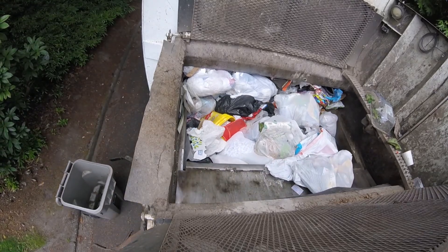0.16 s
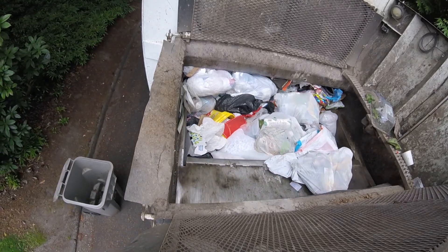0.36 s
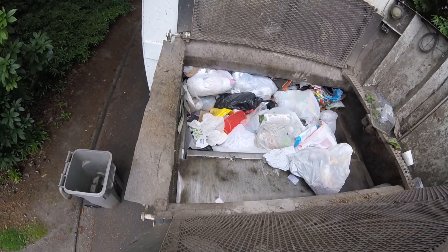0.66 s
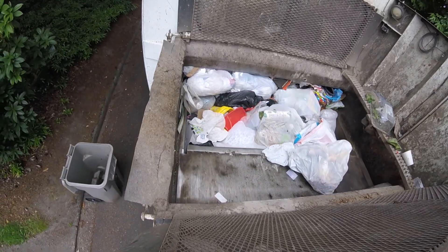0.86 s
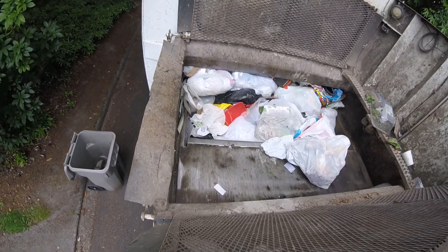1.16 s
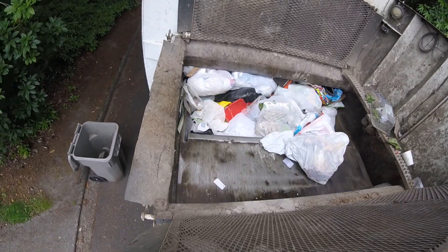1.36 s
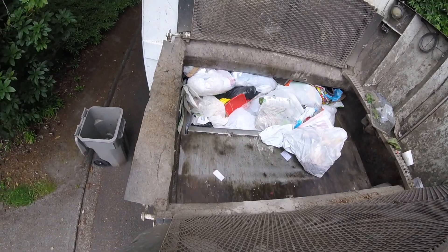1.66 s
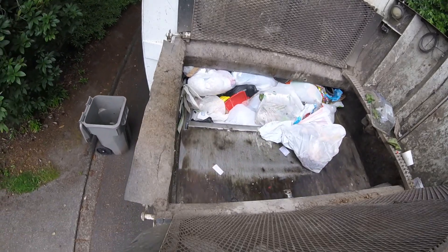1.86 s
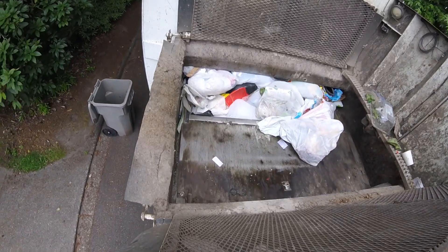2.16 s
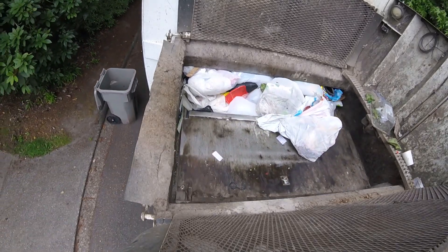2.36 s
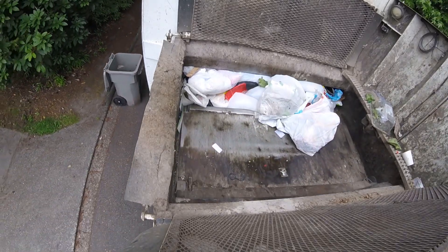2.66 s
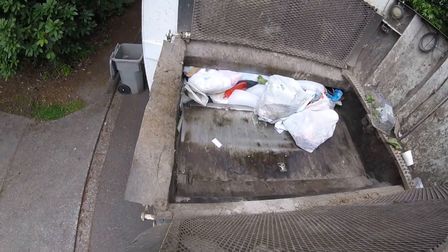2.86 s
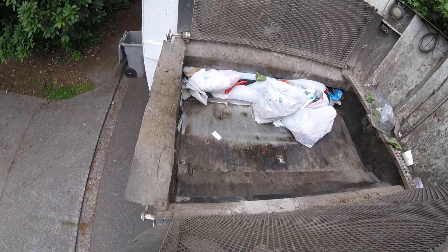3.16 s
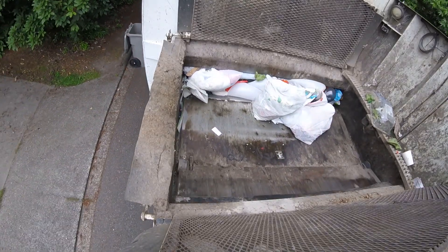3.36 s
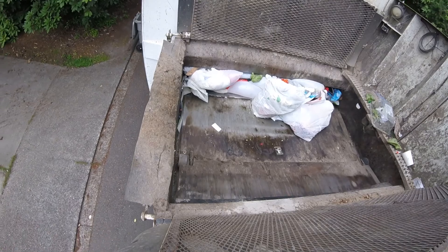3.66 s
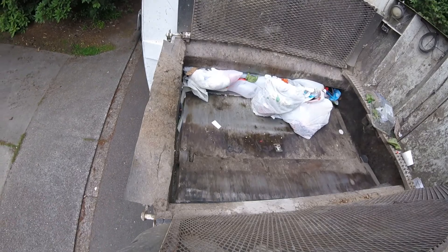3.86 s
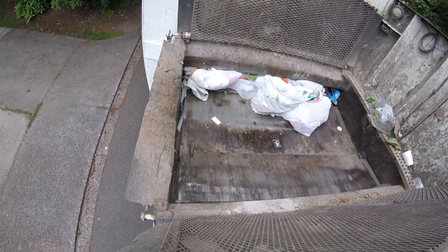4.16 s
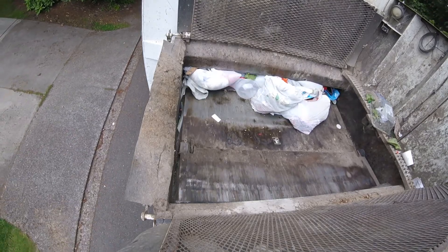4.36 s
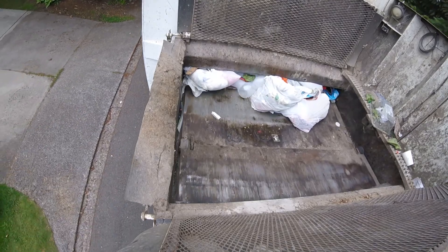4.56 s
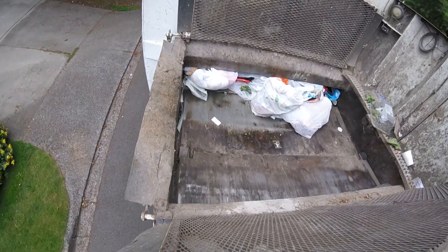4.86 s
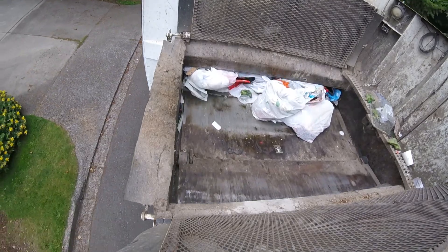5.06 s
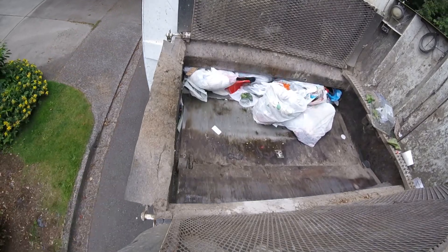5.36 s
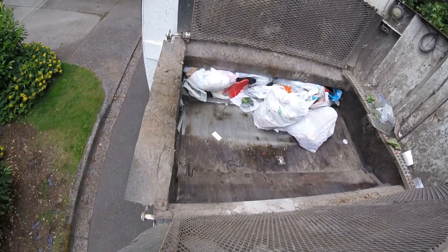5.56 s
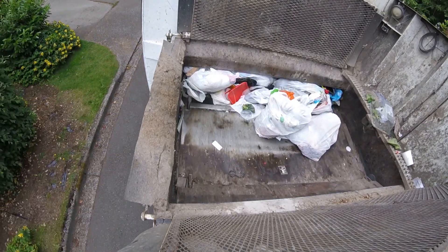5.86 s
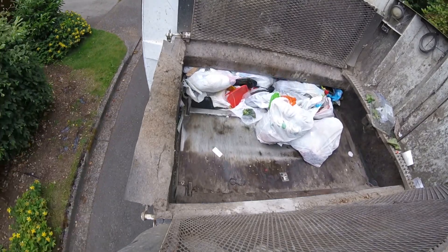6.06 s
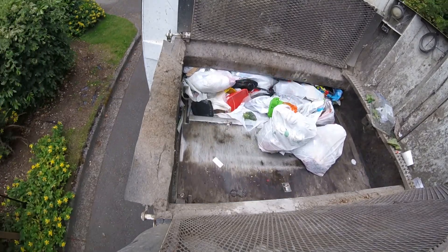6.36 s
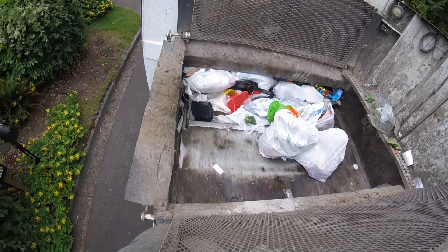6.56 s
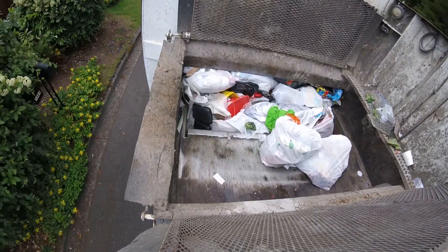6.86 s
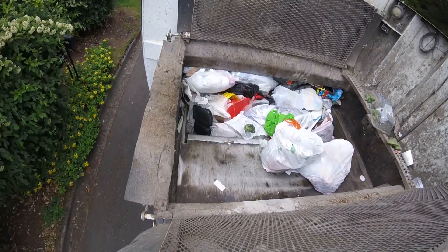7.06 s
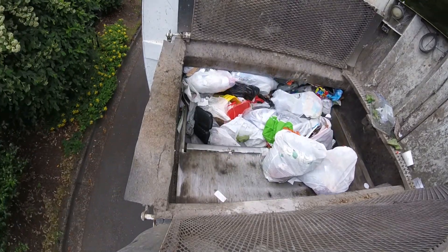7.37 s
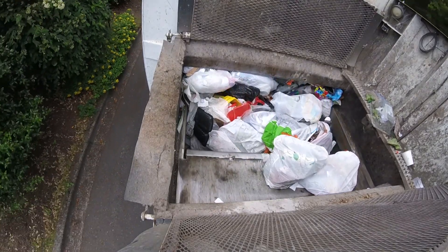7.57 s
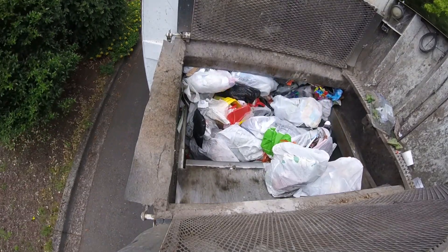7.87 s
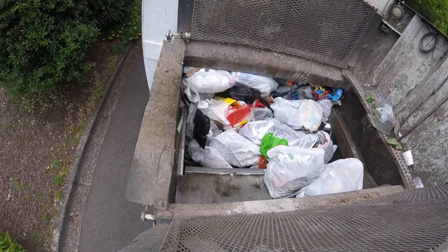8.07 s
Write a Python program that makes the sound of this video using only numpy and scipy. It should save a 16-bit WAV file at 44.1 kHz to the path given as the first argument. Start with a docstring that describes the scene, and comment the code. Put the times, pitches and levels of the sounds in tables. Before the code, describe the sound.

Close above a steel hopper, a truck engine climbs from low throb to whining roar with hissing, knocks, clanks, squeals and two sharp cracks.

```python
"""Garbage truck from above the hopper

A diesel garbage truck revs up and pulls away while its packer works; the camera's microphone is fixed
above the hopper, close to the steel. Engine, pump and gears are tones locked to the firing rate, over
filtered noise for rumble, roar and hiss. Bursts of contact noise are knocks, crunching rubbish and clanks;
ringing modes are thuds, sliding tones are squeaks and a narrow noise band is the turbo whistle.
Two sharp knocks reach the camera itself, whose gain control ducks just ahead and recovers slowly."""
import sys
import numpy as np
from scipy import signal
from scipy.fft import irfft
from scipy.io import wavfile
from scipy.ndimage import uniform_filter1d

SR = 44100
rng = np.random.default_rng(int(sys.argv[2]) if len(sys.argv) > 2 else 0)


def master(y):
    """Save y as 16-bit WAV."""
    cut = np.clip(np.atleast_2d(y).T, -1, 1)
    pcm = np.round(cut * 32767)  # scale
    wavfile.write(sys.argv[1], SR, pcm.astype(np.int16))


N = 362502
TIME = np.arange(N) / SR  # s

# All levels are those ahead of the camera's gain control.
# engine speed: (t/s, firing rate f/Hz)
SPEED = [(0.0, 43.16), (0.48, 49.03), (1.05, 51.45), (1.47, 56.3), (2.02, 61.97), (2.24, 61.28),
         (2.73, 65.3), (3.34, 71.53), (3.76, 78.9), (4.2, 81.4), (4.52, 82.54), (4.78, 86.8), (5.44, 89.54),
         (5.75, 93.46), (5.98, 94.68), (6.75, 83.35), (7.02, 81.5), (7.72, 81.33), (8.22, 81.55)]
# how hard the engine works, which sets its roar and the hiss: (t/s, level change/dB)
LOAD = [(0, 1.5), (.5, 0), (1.2, -1), (1.75, -3.5), (2.5, 0), (3.25, 2.5), (3.6, 4.5), (4.45, 1.5),
        (5.2, -0.8), (5.55, 0), (6, 3), (7.3, 3.5), (7.9, 1.8), (8.22, -2.5)]
# the exhaust pipe favours low firing rates: (f/Hz, level/dB)
EXHAUST = [(43, -18.5), (46.5, -13.5), (54, -13.5), (61.5, -19.5), (69, -27), (76, -19.5), (82, -27.5),
           (94, -32)]
# boom at three times the firing rate, before the panels lift it: (t/s, level/dB)
BOOM = [(0, -56), (1.75, -52), (2.5, -43), (3.6, -43.5), (4.0, -46.5), (4.25, -46.5), (4.5, -44.5),
        (5.3, -45.5), (6.85, -45.5), (7.05, -44), (7.4, -46), (8.05, -43), (8.14, -51)]
# shaking of the body, to which rumble and crank orders are set: (t/s, reference level/dB)
SHAKING = [(0, -28), (.75, -24.5), (1, -33.5), (1.5, -30), (2, -30.5), (3, -29.5), (3.5, -17.5),
           (4.25, -25.5), (4.75, -23), (5.2, -27), (6, -22), (8.22, -25.5)]
# body panels that boom when a tone sweeps through them: (f/Hz, width/Hz, lift/dB)
PANELS = [(182.6, 7.2, 14.5), (219.5, 8.5, 18), (233.3, 11.7, 23), (244.2, 4.5, 29), (257, 7, 14.5),
          (302.3, 10, 19.5), (352, 17, 17), (492, 17, 13.5), (609, 3.9, 15), (621.7, 5.9, 20),
          (698, 9.3, 14), (905, 45, 6)]
# resonances of the steel hopper: (f/Hz, width/Hz, lift/dB)
HOPPER = [(129, 46, 6), (178.07, 3.85, 14.5), (211, 28, 11), (246, 15, 16.5), (265, 14, 6),
          (299.2, 12, 12.5), (351.4, 10.8, 10), (442.7, 14, 7), (480, 10, 11), (558, 12, 8),
          (629.6, 4.9, 11.5), (705.8, 10, 11.5), (776, 20, 5), (875, 14, 7.5), (1182, 33, 3),
          (1292, 9.3, 8)]
# hydraulic pump, ten strokes a crank turn, level at middle speed before pressure and panels:
# (multiple of the stroke rate, level/dB, slope/dB an octave of speed, flutter/0-1, sway/radians)
PUMP = [(1, -40, 1, 0.15, 0.06), (2, -47.5, 0.5, .35, 0.17), (4, -59, -5.5, 0.2, 0.42)]
# oil pressure, highest as the packer squeezes the load: (t/s, change of pump level/dB)
PRESSURE = [(0, 2.5), (1.2, -1.5), (2.4, 2.5), (2.75, 8.5), (3.03, -1.5), (3.1, 1.5), (3.42, 0.5),
            (3.8, 10), (4.3, -1), (5.3, 0.5), (5.65, -12), (6.3, -6.5), (8.22, -7)]
# gear whine passed by the gearbox housing, before drive and overrun: (f/Hz, level/dB)
GEARS = [(180, -45), (215, -23), (250, -40), (261, -25.5), (305, -31.5), (328, -20), (343, -31),
         (360, -26.5), (380, -36), (396, -35)]
# overtones at two and three times the gear whine, before overrun and the hopper's resonances:
# (multiple of the firing rate, level against the roar/dB)
GEAR_OVERTONES = [(8.42, -17.5), (12.63, -20.5)]
# turbocharger whistle: (t/s, f/Hz, level/dB)
TURBO = [(2.7, 7630, -68), (3.2, 8600, -60), (3.7, 9940, -74.5), (4.25, 10950, -77), (5.9, 12000, -84),
         (6.7, 11540, -70), (8.22, 11040, -75)]

# relative spectrum of the body's rumble: (f/Hz, level/dB per Hz)
RUMBLE = [(18, -41.5), (38, 5), (80, -5), (120, 3), (160, -3), (260, -2.5), (380, -2), (520, -14),
          (900, -64)]
# relative spectrum of the combustion roar: (f/Hz, level/dB per Hz)
ROAR = [(200, -27.5), (400, 0.5), (600, -4), (900, -7.5), (1400, -7.5), (1900, -15.5), (2800, -40),
        (5000, -75)]
# relative spectrum of hissing oil and air: (f/Hz, level/dB per Hz)
HISS = [(900, -4.5), (1900, -1), (2600, 0.5), (4200, -5), (5500, -11), (6100, -9), (6550, -6), (7100, -17),
        (9000, -24.5), (10200, -33.5), (11600, -33), (12600, -51)]
# relative weight of the crank orders: (f/Hz, level/dB)
ORDERS = [(20, -22), (45, -2.5), (95, 6.5), (122, -4.5), (180, -4), (300, -5), (500, -16.5), (900, -17),
          (1400, -9.5)]
# relative spectrum of a knock on the hopper: (f/Hz, level/dB per Hz)
BLOW = [(40, -24), (130, -7.5), (260, 2.5), (450, 5), (700, -2), (1000, -10.5), (1400, -17.5), (2000, -25),
        (6000, -40), (10000, -79)]
# relative spectrum of a clank: (f/Hz, level/dB per Hz)
CLANG = [(250, -28), (550, 15), (850, 2), (1480, 1), (1750, -19.5), (2500, -24), (6000, -62.5)]
# relative spectrum of crunching rubbish: (f/Hz, level/dB per Hz)
CRUNCH = [(300, -22.5), (1200, -3), (2800, 1.5), (4200, -1), (5600, -3), (6600, -1.5), (7500, -13),
          (11000, -26.5), (13000, -37)]
# relative spectrum of a crack on the camera's case: (f/Hz, level/dB per Hz)
CASE = [(100, -5.5), (450, 15.5), (800, 2.5), (1300, -2), (3000, -14), (6400, -15.5), (8500, -25),
        (14000, -32)]
# resonances of the camera's case: (f/Hz, width/Hz, lift/dB)
CASE_RINGS = [(720, 120, 3), (1470, 150, 8), (2280, 300, 5.5), (3720, 420, 10.5), (6380, 400, 12)]
# ringing of loose steel fittings: (f/Hz, width/Hz, lift/dB)
FITTINGS = [(733, 19, 14.5), (864, 39, 7.5), (1006, 12, 10.5), (1255, 25, 10.5), (1480, 16, 5.5)]

# rubbish crunching and shifting: (t/s, level/dB, fade/s, tilt/dB an octave, ring f/Hz)
CRUNCHES = [(0, -34, 0.013, -1, 2170), (.022, -33, 0.031, -1, 2500), (.082, -34.5, 0.016, -6, 2290),
            (.525, -32.5, 0.025, -5.5, 2800), (.665, -28.5, 0.021, -1, 3770),
            (.697, -41.5, 0.091, -2, 4380), (1.324, -40, 0.014, 2, 6550), (2.026, -32, 0.03, -6.5, 3830),
            (2.647, -37, 0.019, -3, 4330), (3.277, -36, 0.021, 1, 6416), (3.291, -34.5, 0.022, 8, 4900),
            (3.305, -33, 0.023, -2, 2600), (3.32, -38, .012, 10, 5300), (4.36, -35.5, 0.0063, 4, 5830),
            (4.688, -30.5, 0.034, -0.5, 3498), (4.73, -38, 0.043, 7, 3394), (4.812, -33, .012, -2.5, 3200),
            (5.37, -41, 0.019, -5, 2200)]
# the load tumbling and shuddering in the hopper: (t/s, level/dB, fade/s, tilt/dB an octave)
KNOCKS = [(.01, -20.5, 0.029, 3.5), (.545, -27, 0.052, -3.5), (.61, -23, 0.069, 4), (1.303, -22, 0.015, -4),
          (1.317, -9, 0.031, -1.5), (1.385, -19.5, 0.06, -5), (1.476, -25, 0.011, -3),
          (1.5, -26.5, 0.053, 1), (1.738, -24.5, 0.045, -1.5), (2.02, -21.5, 0.12, -5),
          (2.665, -26.5, 0.091, -1.5), (3.255, -18, 0.062, 0), (3.298, -17, 0.048, -4),
          (3.354, -17, 0.06, -2.5), (4.692, -15, 0.13, -4), (4.825, -19, 0.11, -6.5),
          (5.8, -26.5, 0.071, -0.5), (6.575, -18, 0.087, -7.5), (7.398, -16.5, 0.053, -2.5),
          (7.44, -15.5, 0.052, -1), (7.73, -15.5, 0.057, -2.5), (7.775, -19, 0.12, -1),
          (8.01, -15, 0.041, -5), (8.141, -14, 0.026, 1.5), (8.19, -19, 0.071, -2.5)]
# loose fittings clanking: (t/s, level/dB, fade/s, tilt/dB an octave)
CLANKS = [(.038, -21, 0.0093, 8), (.085, -25.5, 0.016, 5), (1.292, -19, 0.02, 4), (1.308, -27, 0.014, 7.5),
          (1.323, -25, 0.051, -1), (1.476, -29, 0.0077, -6), (1.662, -33, .01, 1), (2.03, -29, 0.057, -4),
          (3.297, -27, .014, -10.5), (3.316, -34, 0.012, -5), (3.378, -32.5, .025, -4.5),
          (7.778, -33, 0.013, -5.5), (8.1045, -20, 0.0098, 2), (8.143, -19, 0.026, -3.5),
          (8.191, -21, .017, -2.5)]
# a small click as the camera's gain drops, and two sharp knocks at the camera with their rebounds;
# crack levels are before halving:
# (t/s, push peak level/dB, push width/s, crack level/dB, crack tilt/dB an octave)
TAPS = [(1.2635, -36, 0.00043, -1.5, -1), (3.4425, 10, 0.000745, 5.5, 1.5), (3.4507, 2.5, 0.00038, -2, -2),
        (4.5611, 3.5, 0.0007, 1.5, 0.5), (4.5663, -3, 0.00047, -6, -0.5), (4.5685, -10, 0.00047, -15.5, -2)]
# solid blows that ring the hopper: (t/s, level/dB, favoured f/Hz)
THUDS = [(1.305, -9, 180), (1.321, -13.5, 517), (1.362, -25, 710), (1.503, -17.5, 290), (1.746, -25, 450),
         (1.832, -17, 231), (3.266, -21, 270), (3.305, -17, 704), (3.36, -18, 260), (3.372, -18.5, 504),
         (4.693, -6.5, 287), (4.706, -11, 480), (4.723, -3.5, 287), (4.754, -2.5, 295), (4.775, -12, 475),
         (4.785, -14, 265), (4.833, -9, 280.8), (4.872, -11, 296), (4.906, -11, 199.8), (4.94, -16, 270),
         (6.472, -22, 485.6), (6.581, -19, 260), (7.4, -17, 310), (8.198, -11.5, 219.6)]
# steel sliding on steel: (t/s, swell/s, fade/s, first f/Hz, last f/Hz, bend of the slide/1 = straight,
# jitter/Hz, level at the top of the swell/dB)
SQUEAKS = [(1.64, 0.055, 0.094, 8300, 7950, 1.5, 48, -63), (2.235, 0.014, 0.15, 5800, 5110, 1.5, 58, -46),
           (2.38, .07, .08, 5100, 4960, 1.6, 23, -52), (2.24, 0.037, .25, 11450, 10050, 2.3, 110, -67),
           (2.32, .07, .04, 13150, 14000, 1, 130, -63), (2.48, 0.14, 0.15, 10830, 7810, 1.3, 42, -49.5),
           (2.63, 0.036, 0.16, 11750, 8900, 1.3, 120, -62.5), (2.745, 0.018, .06, 7840, 7850, 1, 40, -59),
           (2.79, 0.037, 0.047, 7800, 8790, .8, 61, -64), (2.79, 0.046, .04, 8950, 9800, 0.71, 90, -65),
           (3.285, .014, .035, 4700, 4670, 1.5, 39, -35.5), (3.299, 0.013, 0.019, 5300, 5570, 1.6, 60, -35),
           (3.284, 0.016, .016, 7250, 7450, 1, 90, -43), (3.376, 0.024, 0.012, 3640, 3620, 1.6, 18, -43.5),
           (3.915, .012, .02, 10100, 10050, 0.98, 90, -56), (3.945, 0.023, 0.024, 10500, 9950, 1, 260, -52),
           (3.955, .08, .13, 8552, 8547, 2, 6, -37.5), (4.15, 0.047, 0.05, 3090, 3078, 1.6, 10.3, -37),
           (4.688, 0.015, 0.014, 3453, 3300, 1, 52, -41), (4.738, .018, .018, 3150, 3120, 1, 20, -46),
           (5.85, 0.028, 0.029, 3470, 3436, 1.43, 16, -43), (6.11, 0.025, 0.022, 3326, 3623, 1, 30, -47)]

MID_SPEED_HZ = 70  # firing rate
HUM_DB, HUM_DB_PER_OCTAVE = -50.5, 18  # at middle speed, off resonance; grows with speed
ROAR_DB, ROAR_DB_PER_OCTAVE, HISS_DB = -35, 3, -42  # at middle speed and load; the roar grows with speed
HIGH_WHINE_DB, HIGH_WHINE_DB_PER_OCTAVE = -55.5, -1.5  # at middle speed, off resonance
OVERRUN_DB, OVERRUN_HZ_PER_S = 6, 15  # the gears whine this much louder when the engine slows this fast
OVERTONES_OVERRUN_DB = 2.5  # the gear overtones swell less
GEAR_IN_S, GEAR_BITE_S, UNLOADED_DB = 2.13, 0.078, -9.5  # gears are quiet until they take up the drive
KNOCK_RISE, CLANK_RISE, CRUNCH_RISE = 0.3, 0.063, 0.2  # rise time as a share of the fade time
EDGE_HZ = 14400  # upper limit of the camera's sound


def amp(db):
    """Amplitude factor of a level in dB."""
    return 10 ** (np.asarray(db) / 20)


def unit(x):
    """Scale to rms 1."""
    return x / np.sqrt(np.mean(x ** 2) + 1e-20)


def curve(rows, axis=1):
    """One column of a timed table, drawn as straight lines over the whole scene."""
    rows = np.asarray(rows)
    return np.interp(TIME, rows[:, 0], rows[:, axis])


def add(mix, s, sound):
    """Lay a sound into the mix from s seconds on."""
    part = mix[max(round(s * SR), 0):][:len(sound)]
    part += sound[:len(part)]


def wander(hz):
    """Slow chance of rms 1, up to about hz."""
    f = np.fft.rfftfreq(N, 1 / SR)[:2000]
    chance = rng.standard_normal(len(f)) + 1j * rng.standard_normal(len(f))
    slow = irfft(chance / (1 + (f / hz) ** 4), 8192)
    return unit(np.interp(TIME, np.linspace(0, TIME[-1], len(slow)), slow))


def lift(hz, modes):
    """Gain in dB that a set of resonances gives at each frequency."""
    gain = 1
    for centre, width, db in modes:
        gain = gain + (amp(db) - 1) / (1 + (2 * (hz - centre) / width) ** 2)
    return 20 * np.log10(gain)


def level(hz, spectrum):
    """Level in dB of a smooth spectrum at each frequency."""
    f, db = np.transpose(spectrum)
    return np.interp(np.log(hz), np.log(f), db)


def colour(x, spectrum, modes=(), tilt_db=0, size=16384):
    """Causal filter: a smooth spectrum, tilted in dB an octave, with ringing resonances on top."""
    hz = abs(np.fft.fftfreq(size, 1 / SR)) + 1
    tilt = tilt_db * np.log2(np.clip(hz, 200, 8000) / 1000)
    db = level(hz, spectrum) + lift(hz, modes) + tilt
    # minimum phase: the response starts at once and only rings afterwards
    log_gain = db * np.log(10) / 20
    response = np.fft.ifft(np.exp(np.conj(signal.hilbert(log_gain)))).real
    return signal.oaconvolve(x, response[:size // 2])[:len(x)]


def tone(phase, level_db, flutter, sway):
    """One line of a rotating part, trembling in strength and phase."""
    strength = np.sqrt(2) * amp(level_db) * (1 + flutter * wander(14.7))
    return strength * np.sin(phase + sway * wander(8.7))


def revs():
    """Engine speed in octaves above its middle speed."""
    return np.log2(curve(SPEED) / MID_SPEED_HZ)


def roar_level():
    """The roar in dB grows with load and speed."""
    return ROAR_DB + curve(LOAD) + ROAR_DB_PER_OCTAVE * revs()


def overrun():
    """How far the slowing engine is driven by its gears, 0-1."""
    slowing = -np.gradient(uniform_filter1d(curve(SPEED), size=8000)) * SR
    return np.clip(slowing / OVERRUN_HZ_PER_S, 0, 1)


def engine(firing):
    """Six cylinders: exhaust note, boom, hum, and crank orders that light up the hopper in passing."""
    hz = curve(SPEED)
    pipe_db = level(hz, EXHAUST)
    note = tone(firing, pipe_db, flutter=0.081, sway=0.02)
    note += tone(2 * firing, pipe_db - 24.5, flutter=0.17, sway=0.071)
    boom = tone(3 * firing, curve(BOOM) + lift(3 * hz, PANELS), flutter=0.04, sway=0.059)
    hum_db = HUM_DB + HUM_DB_PER_OCTAVE * revs() + lift(2 * hz, HOPPER)
    hum = tone(2 * firing, hum_db, flutter=0.095, sway=0.3)

    uneven_db = -4.5  # orders between the firing harmonics come from unequal cylinders
    shake = firing + 0.17 * wander(10.0)
    orders = np.zeros(N)
    for k in range(1, 25):  # in halves of the firing rate
        if k not in (2, 6):  # the exhaust note and the boom stand there
            orders += amp(uneven_db * (k % 2)) * np.cos(k * shake / 2 + 2 * np.pi * rng.random())
    orders = unit(colour(orders, ORDERS, HOPPER)) * amp(curve(SHAKING) - 5.5)
    return note + boom + hum + orders


def hydraulics(firing):
    """Pump and gears turn with the crank; their lines swell as they cross the resonances of the body."""
    stroke, tooth, high = 10 / 3, 4.21, 9.87  # multiples of the firing rate
    hz = curve(SPEED)
    pump = np.zeros(N)
    for k, db, slope_db, flutter, sway in PUMP:
        pump_db = db + slope_db * revs() + curve(PRESSURE) + lift(k * stroke * hz, PANELS)
        pump += tone(k * stroke * firing, pump_db, flutter, sway)

    unloaded = np.clip((GEAR_IN_S - TIME) / GEAR_BITE_S, 0, 1)
    gears_db = level(tooth * hz, GEARS) + UNLOADED_DB * unloaded + OVERRUN_DB * overrun()
    gears = tone(tooth * firing, gears_db, flutter=0.12, sway=0.1)
    singing_db = HIGH_WHINE_DB + HIGH_WHINE_DB_PER_OCTAVE * revs() + lift(high * hz, PANELS)
    singing = tone(high * firing, singing_db, flutter=0.43, sway=0.27)

    overtones = np.zeros(N)
    for multiple, db in GEAR_OVERTONES:
        overtones += tone(multiple * firing, roar_level() + db, flutter=0.65, sway=0.75)
    overtones *= amp(OVERTONES_OVERRUN_DB * overrun())
    flat = [(20, 0), (1500, 0)]
    return pump + gears + singing + colour(overtones, flat, HOPPER)


def body_noise(firing):
    """The hopper rumbles; combustion roar and the hiss of oil and air pulse with the firings."""
    rumble, roar, hiss = rng.standard_normal((3, N))
    beat = np.cos(firing)
    rumble = unit(colour(rumble, RUMBLE, HOPPER))
    rumble *= amp(curve(SHAKING) - 0.5 + 1.5 * wander(6.6))
    roar = unit(colour(roar * (1 + 0.089 * beat), ROAR, HOPPER, tilt_db=-0.25))
    roar *= amp(roar_level() + 1.2 * wander(7.8))
    hiss = unit(colour(hiss * (1 + 0.047 * beat), HISS))
    hiss *= amp(HISS_DB + curve(LOAD) + 0.31 * wander(23))
    return rumble + roar + hiss


def blows(rows, rise_share, spectrum, modes, grain_db, ring_width=550, ring_db=7, size=26000):
    """Each blow is a crowd of small contacts that swells and dies away, coloured by what it strikes."""
    out, t = np.zeros(N), np.arange(size) / SR
    for s, db, fade, tilt_db, *ring_hz in rows:
        rise = rise_share * fade
        grains = grain_db * np.minimum(rng.exponential(1, size), 4)
        contacts = unit(rng.standard_normal(size) * amp(grains))
        force = np.minimum(t / rise, 1) * np.exp(-np.maximum(t - rise, 0) / fade)
        rings = list(modes) + [(hz, ring_width, ring_db) for hz in ring_hz]
        sound = unit(colour(contacts * force, spectrum, rings, tilt_db))
        add(out, s, amp(db) * sound * np.sqrt(np.mean(force ** 2)))
    return out


def crunches():
    """Rubbish gives way in coarse grains, each crunch with a ring of its own."""
    return blows(CRUNCHES, CRUNCH_RISE, CRUNCH, (), grain_db=5.0)


def knocks():
    """The tumbling load strikes the hopper in dense contacts and excites its resonances."""
    return blows(KNOCKS, KNOCK_RISE, BLOW, HOPPER, grain_db=2.5)


def clanks():
    """Loose fittings strike with a quick rise and ring at their own resonances."""
    return blows(CLANKS, CLANK_RISE, CLANG, FITTINGS, grain_db=6.0)


def taps(crack_s=0.001, rattle_s=0.013, rattle_db=-16, skew=0.35, size=4000):
    """Gain click and camera knocks: a crack with case rings over a low push and deeper pull, and a rattle."""
    out, t = np.zeros(N), np.arange(size) / SR
    for s, push_db, width, crack_db, tilt_db in TAPS:
        u = t / width - 2.7  # time in widths from the middle of the push
        push = -(u + skew) * np.exp(-u ** 2 / 2)
        rattle = amp(rattle_db + push_db / 2) * np.exp(-t / rattle_s)  # harder knocks rattle more
        force = np.exp(-t / crack_s) + rattle
        case = unit(colour(rng.standard_normal(size), CASE, CASE_RINGS, tilt_db))
        crack = np.tanh(case) * force
        add(out, s, amp(push_db) * push / abs(push).max() + 0.5 * amp(crack_db) * crack)
    return out


def thuds(rise_s=0.0027, focus_db=15, spread_db=3.0, size=30000):
    """A solid blow rings the hopper; where it lands decides which resonances answer most."""
    out, t = np.zeros(N), np.arange(size) / SR
    hz, width, lift_db = np.transpose(HOPPER)[:, :, None]
    for s, db, favoured_hz in THUDS:
        off_focus = focus_db * abs(np.log2(hz / favoured_hz))
        chance_db = spread_db * rng.standard_normal(hz.shape)
        weight = np.sqrt(width) * amp(lift_db - off_focus + chance_db)
        swing = np.sin(2 * np.pi * (hz * t + rng.random(hz.shape)))
        rings = weight * np.exp(-np.pi * width * t) * swing  # wide resonances die sooner
        add(out, s, amp(db) * np.minimum(t / rise_s, 1) * rings.sum(0) / np.linalg.norm(weight))
    return out


def squeaks(ends_db=-14, flutter_db=1.5):
    """Thin whistles swell and fade as their pitch slides, trembling as the steel grips and slips."""
    out, unsteady = np.zeros(N), wander(200)
    for s, swell, fade, first_hz, last_hz, bend, jitter_hz, db in SQUEAKS:
        t = np.arange(0, swell + fade, 1 / SR)
        slide = last_hz + (first_hz - last_hz) * (1 - t / t[-1]) ** bend
        pitch = slide + jitter_hz * np.interp(s + t, TIME, unsteady)
        whistle = np.sqrt(2) * np.sin(2 * np.pi * np.cumsum(pitch) / SR)
        shape_db = np.interp(t, [0, swell, swell + fade], [ends_db, 0, ends_db])
        add(out, s, whistle * amp(db + shape_db) * signal.windows.tukey(len(t), 0.1))
    return out * amp(flutter_db * wander(45))


def turbo(width_hz=320):
    """A faint, breathy whistle: a narrow band of noise carried up as the engine works, then sinking."""
    turn = np.exp(2j * np.pi * np.cumsum(curve(TURBO)) / SR)
    fuzz = rng.standard_normal((2, N))
    fuzz = signal.lfilter([1], [1, -np.exp(-np.pi * width_hz / SR)], fuzz)
    fuzz = uniform_filter1d(fuzz, size=36)  # trims the skirts of the band
    whistle = unit(((fuzz[0] + 1j * fuzz[1]) * turn).real)
    return whistle * amp(curve(TURBO, axis=2)) * (TIME > TURBO[0][0])


def scene():
    """The running machine, with the load and the steelwork sounding over it."""
    firing = 2 * np.pi * np.cumsum(curve(SPEED)) / SR  # phase in radians
    machine = engine(firing) + hydraulics(firing) + body_noise(firing) + turbo()
    load = crunches() + knocks()
    steel = clanks() + thuds() + squeaks()
    return (machine + load + steel + taps())[None]


def record(dry, ceiling_db=-4.5, ahead_s=0.036, recovery_db=11):
    """Camera gain looks ahead, drops at once for a peak, recovers in dB a second; then the band limit."""
    peak_db = 20 * np.log10(abs(dry[0]) + 1e-9)
    recovery = recovery_db * TIME
    held_db = np.maximum.accumulate(peak_db + recovery) - recovery
    over_db = np.maximum(held_db - ceiling_db, 0)
    early_db = np.interp(TIME + ahead_s, TIME, over_db)
    ducked = dry / amp(uniform_filter1d(early_db, size=24))
    band = signal.firwin(511, EDGE_HZ, window=("kaiser", 9), fs=SR)
    return signal.oaconvolve(ducked, band[None], "same")


dry = scene()
out = record(dry)
master(out)
```